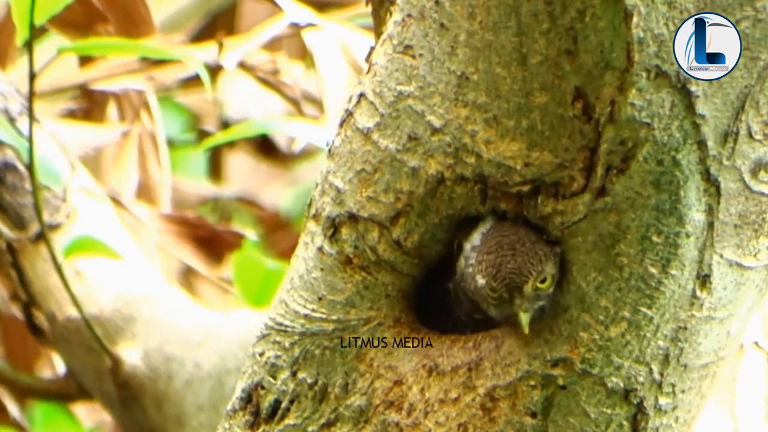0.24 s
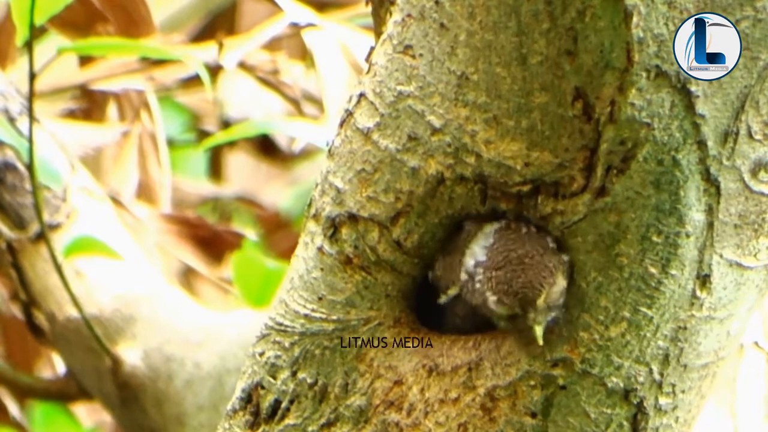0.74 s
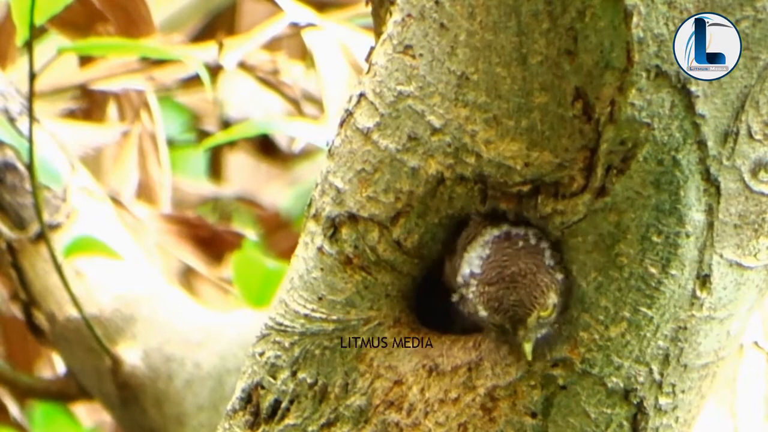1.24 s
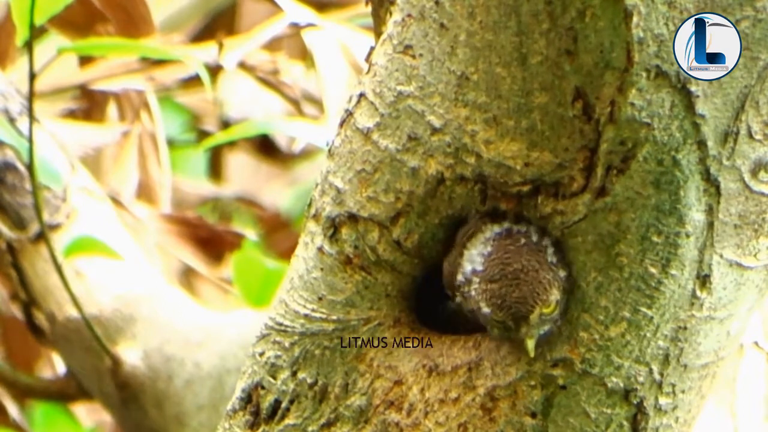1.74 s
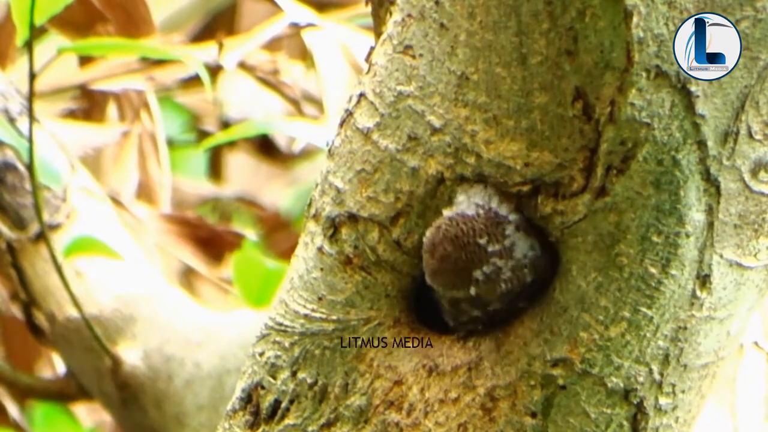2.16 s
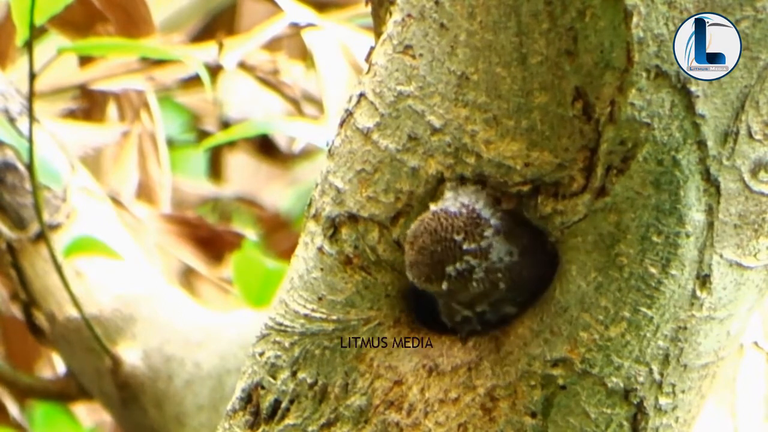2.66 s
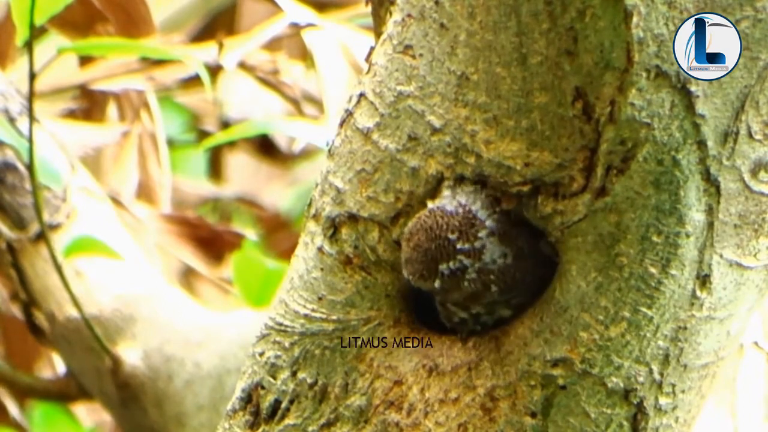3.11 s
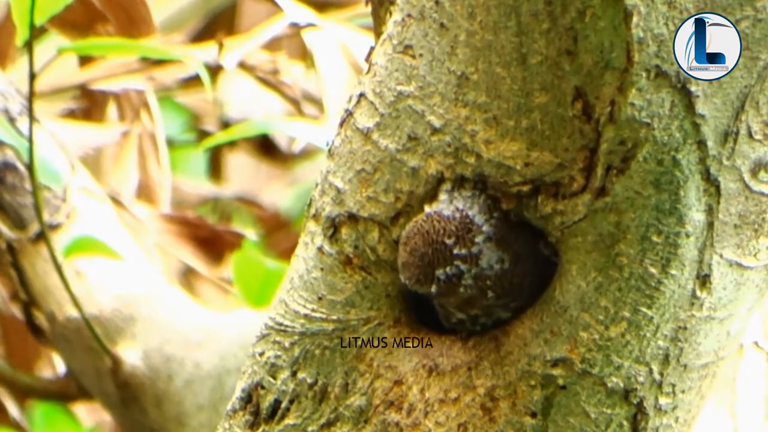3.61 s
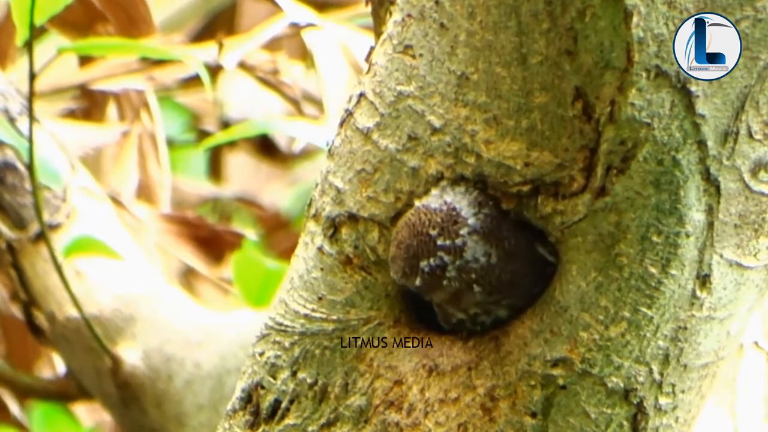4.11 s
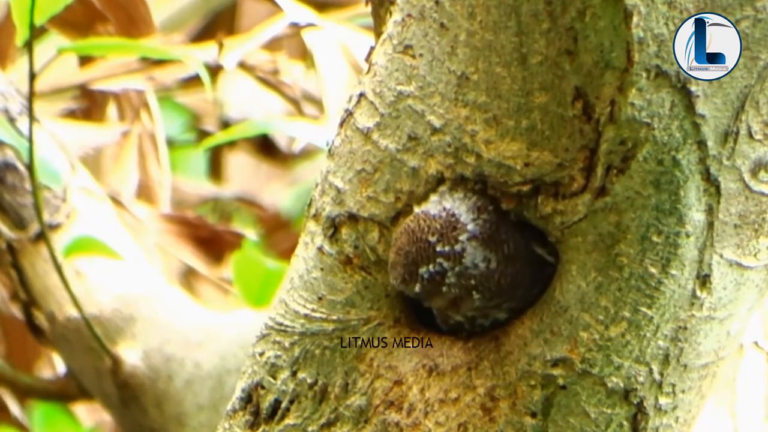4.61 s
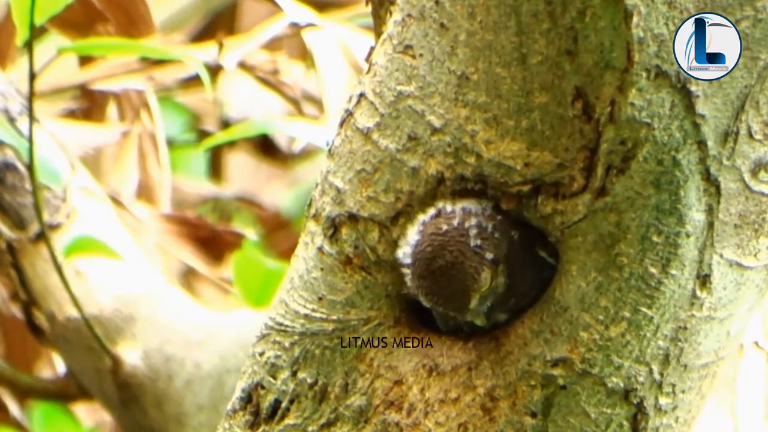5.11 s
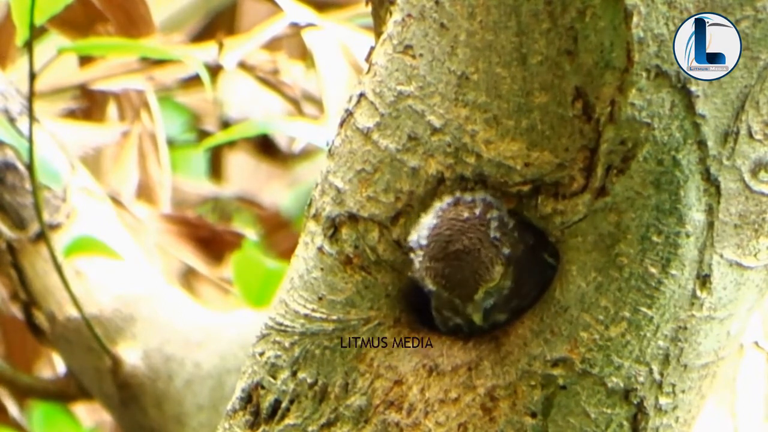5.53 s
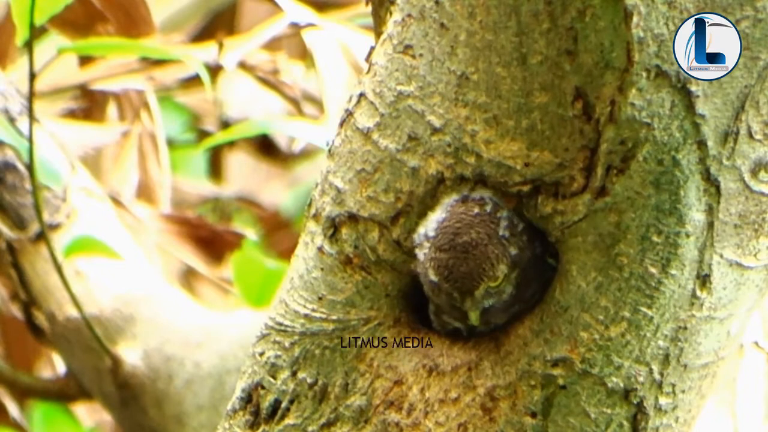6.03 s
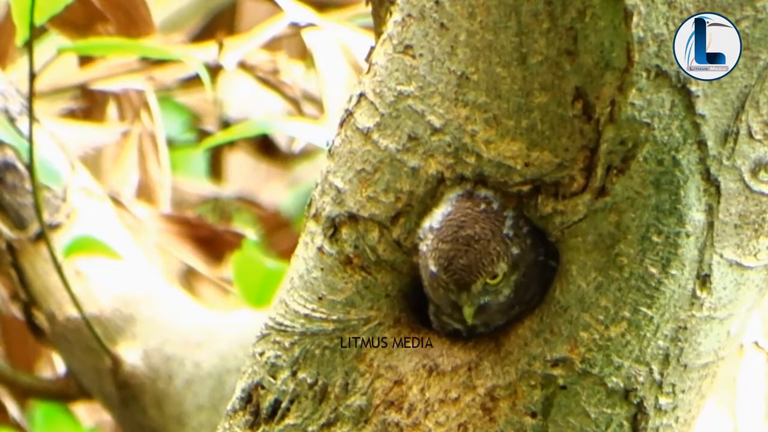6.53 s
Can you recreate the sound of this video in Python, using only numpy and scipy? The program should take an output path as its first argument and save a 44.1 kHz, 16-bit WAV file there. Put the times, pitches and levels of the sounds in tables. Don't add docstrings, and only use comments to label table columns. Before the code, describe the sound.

A wood full of insects, heard outdoors in stereo. At 0 s a shrill, rough cicada chorus is loud, with a nearer singer bursting unevenly for the first second; it sinks steadily until about 4 s, then returns slightly near the end. A small owl, a little left, calls at about 0.2, 1.0, 1.9, 2.7, 3.5, 4.3, 5.2 and 6.0 s: a short, flute-like arched hoot, then a quick trill of falling notes, echoed softly by trunks. A far owl sounds faintly at 1.3, 2.6 and 5.8 s. A bird whistles one rising note at 3 s. From 3.2 s another cicada gives bright, thin strokes every 0.4 s. A near cricket chirps in threes about once a second, a low cricket throbs, and katydids flutter in a very high hiss. Faint hum, soft air puffs, strongest near 3.9 s, and a tiny twig tick at 5.4 s.

```python
import sys
import numpy as np
from scipy import signal
from scipy.io import wavfile
from scipy.ndimage import uniform_filter1d

SR = 44100
rng = np.random.default_rng(int(sys.argv[2]) if len(sys.argv) > 2 else 0)


def int16_out(signal):
    q = np.round(np.clip(np.atleast_2d(signal).T, -1, 1) * 32767)
    wavfile.write(sys.argv[1], SR, q.astype(np.int16))


def volts(x):
    e = np.asarray(x, float) / 20
    return 10 ** e


N = 298116
T = np.arange(N) / SR


def evened(x):
    return x / np.sqrt(np.mean(x ** 2) + 1e-20)


def read(points, hz):
    f, value = np.transpose(points)
    return np.interp(np.log(hz + 1), np.log(f + 1), value)


def columns(rows):
    s, *rest = np.transpose(rows)
    return [np.interp(T, s, column) for column in rest]


def add(mix, s, sound):
    part = mix[round(s * SR):][:len(sound)]
    part += sound[:len(part)]


def resonate(x, hz, width, order=2):
    turn = np.exp(2j * np.pi * np.cumsum(hz * np.ones(len(x))) / SR)
    r = np.exp(-np.pi * width / SR)
    smooth = signal.lfilter([(1 - r) ** order], np.poly([r] * order), x * turn.conj())
    return 2 * (turn * smooth).real


def drift(hz):
    knots = rng.standard_normal(400)
    return np.interp(T * hz, np.arange(400), knots)


def swells(rows, rise, fall):
    return sum(volts(db) * np.exp(-((T - s) / np.where(T < s, rise, fall)) ** 2) for s, db in rows)


def buzz(per_s, sharp, hz, width, jitter=0.0204):
    turns = np.cumsum(per_s * (1 + jitter * drift(22))) / SR
    gate = np.exp(sharp * (np.cos(2 * np.pi * turns) - 1))
    return evened(resonate(gate * rng.standard_normal(N), hz, width, order=3))


def hiss(spectrum, patchy_db, ripple_db):
    # pitch_hz, likeness (-1 to 1)
    same_points = [(60, 1), (100, .98), (180, .1), (310, -.35), (950, -.2), (1650, .1), (2860, .3),
                   (4970, .9), (8640, .93), (15000, .88)]
    # pitch_hz, left_minus_right_db
    lean_points = [(60, 0), (180, 0.5), (550, 1.8), (1650, 0.61), (4970, -1.2), (15000, -2)]
    frames, hz = N // 256 + 5, np.fft.rfftfreq(1024, 1 / SR)
    a, b, c, d, patches = rng.standard_normal((frames, 513, 5)).T
    patches = uniform_filter1d(patches, size=10, axis=0)
    patches = evened(uniform_filter1d(patches, size=10, axis=1))
    same = np.clip(read(same_points, hz), -1, 1)[:, None]
    left = a + 1j * b
    right = same * left + np.sqrt(1 - same ** 2) * (c + 1j * d)
    z = np.array([left, right])
    lean_db = read(lean_points, hz)[:, None] / 2 * np.array([1, -1])[:, None, None]
    ripple = evened(uniform_filter1d(rng.standard_normal((513, 1)), size=1, axis=0))
    colour_db = read(spectrum, hz)[:, None]
    z *= volts(colour_db + patchy_db * patches + lean_db + ripple_db * ripple)
    return evened(signal.istft(z, nperseg=1024, noverlap=768)[1][:, :N])


def wood(x, t60, gap_s):
    taps = np.zeros((2, SR // 2))
    slots = np.arange(0, SR // 2 - 20, 20)
    at = slots + rng.integers(0, 20, (2, len(slots)))
    np.put_along_axis(taps, at, rng.choice([-1., 1.], at.shape), 1)
    t = np.arange(SR // 2) / SR
    taps *= volts(-60 * t / t60) * np.clip(t / gap_s, 0, 1)
    return signal.fftconvolve(x[None], taps / np.linalg.norm(taps[0]), axes=1)[:, :N]


def note(length, first_hz, top_hz, last_hz, top_at, loud_at, half_db):
    overtone_db = -21.5
    u = np.linspace(0, 1, round(length * SR))
    rising = (first_hz - top_hz) * (1 - u / top_at) ** 2
    falling = (last_hz - top_hz) * (abs(u - top_at) / (1 - top_at)) ** 1.117
    turn = 2 * np.pi * np.cumsum(top_hz + np.where(u < top_at, rising, falling)) / SR
    swell = np.sin(np.pi / 2 * np.interp(u, [0, loud_at, 1], [0, 1, 0])) ** 1.01
    half_line = volts(half_db) * np.exp(-((u - .25) / 0.2) ** 2) * np.sin(3 * turn / 2)
    return swell * (np.sin(turn) + volts(overtone_db) * np.sin(2 * turn)) + half_line


def air():
    # pitch_hz, level_db
    hum = [(15, -52), (25, -40), (129, -18), (794, -17.5), (1110, -10), (1780, -18), (2130, -14),
           (2430, -20), (3550, -23.5), (4650, -10.5), (6530, -20.5), (7630, -22), (8460, 1), (9640, -19),
           (12500, -25.5), (16200, -38), (22000, -120)]
    # middle_s, length_s, strength_db
    puffs = [
        (0.298, .15, 6.7),
        (.98, .15, 5.4),
        (1.5, .15, 5.7),
        (2.05, 0.14, 3.3),
        (2.851, 0.063, 2.9),
        (3.931, 0.18, 10.5),
        (4.48, 0.07, 7),
        (5.4, 0.38, 4.5),
    ]
    # start_s, level_db
    twig = [
        (5.3868, -44),
    ]
    calm_db = -2 * np.maximum(T - 1.57, 0)
    puff_db = sum(db * np.exp(-((T - s) / length) ** 2) for s, length, db in puffs)
    rumble = volts(-82 + calm_db + 0.1 * puff_db) * buzz(5, .01, 39.0, 28)
    thud = volts(-87.5 + 0.45 * calm_db + 0.89 * puff_db) * buzz(5, .01, 108.0, 90)
    gust = np.array([buzz(6.4, 0.0066, 409, 740) for ear in range(2)])
    gust = volts(-76.5 + 0.22 * calm_db + 0.97 * puff_db) * gust
    tick = np.zeros(N)
    snap = np.diff(rng.standard_normal(60), 2) * np.exp(-np.arange(58) / 15)
    add(tick, twig[0][0], volts(twig[0][1] - 9) * snap)
    return volts(-57) * hiss(hum, 2.17, 1.0) + rumble + thud + gust + tick


def fading_chorus():
    # time_s, level_db, body_pitch_hz
    chorus = [(0, -38, 8550), (.5, -42, 8430), (1.1, -42.5, 8394), (1.6, -46.5, 8245), (2.1, -49.5, 8316),
              (2.7, -50, 8230), (3.4, -55, 8214), (4.2, -60.5, 8100), (5.1, -57.5, 8420), (5.9, -58, 8320),
              (6.76, -53, 8420)]
    level_db, hz = columns(chorus)
    change_db = level_db - level_db.mean()
    low_db = -71 + 0.8 * change_db
    high_db = -63.5 + 0.46 * change_db - 18 * np.clip((T - 4) / 0.57 + .5, 0, 1)
    throb_db = 1.2 * drift(36) + .5 * drift(9)
    out = volts(level_db - 3.0 + throb_db) * buzz(230, 0.36, hz, 810)
    out += volts(low_db - 5.0 + 2.8 * drift(30)) * buzz(63, 0.057, 2152, 237)
    return out + volts(high_db - 9.0) * buzz(205, 0.32, 4096, 370)


def single_cicadas():
    # time_s, level_db
    leader = [(.012, -36), (.085, -38), (.19, -49), (.245, -37), (.3, -40), (.39, -40), (.44, -49),
              (.535, -40), (.635, -55), (.72, -46), (.89, -47)]
    # pitch_hz, throbs_per_s, start_level_db, loss_db_per_s, stop_s
    singers = [
        (8230, 16, -51, 3, 2.6),
        (8640, 17, -56, 8, 1.5),
        (8810, 11.5, -58, 1.5, 3.1),
        (9065, 14.5, -58, 2, 2.8),
        (7870, 8.3, -59, 3.5, 4.9),
    ]
    singer_widths = [51, 39, 36.5, 23.4, 256]
    burst_s = 0.017
    bursts = swells(leader, burst_s, burst_s) + volts(-47 - 8.8 * T)
    tone = np.sin(2 * np.pi * np.cumsum(8430 + 14 * drift(25.16)) / SR)
    out = bursts * evened(tone + 0.36 * buzz(24, 0.21, 8430, 60))
    for (line_hz, per_s, start_db, loss_db, stop), width in zip(singers, singer_widths):
        level = np.clip((stop - T) / .3, 0, 1) * volts(start_db - loss_db * T)
        out += level * buzz(per_s, .7, line_hz, width, jitter=.05)
    return out


def starting_cicada():
    # start_s, level_db, length_s
    strokes = [
        (3.164, -47, 0.083),
        (3.614, -42.5, 0.053),
        (4.0457, -39.5, 0.048),
        (4.451, -43.5, 0.058),
        (4.88, -43, 0.033),
        (5.2696, -43.5, 0.052),
        (5.703, -44, 0.077),
        (6.097, -40, 0.041),
        (6.534, -45, 0.049),
    ]
    out = np.zeros(N)
    t = np.arange(round(.35 * SR)) / SR
    for s, db, length in strokes:
        since = s - strokes[0][0]
        body_hz = 8425 + 84 * since
        swell = np.clip(t / 0.0042, 0, 1)
        swell *= np.where(t < length, 1, 0.53 * np.exp(-(t - length) / 0.073))
        upper = (.1 + .17 * since) * np.exp(2j * np.pi * 275 * t)
        ribs = 1 + upper + 0.22 * np.exp(-2j * np.pi * 140 * t)
        wobble = np.cumsum(uniform_filter1d(rng.standard_normal(len(t)), size=200)) * 0.0013
        tone = (ribs * np.exp(1j * (2 * np.pi * body_hz * t + wobble))).real
        add(out, s, volts(db - 5) * uniform_filter1d(swell, size=500) * tone)
    return out


def katydids():
    # pitch_hz, level_db
    katydid_colour = [(8000, -33), (11000, -21), (12600, -13), (13500, -10.5), (14400, -4), (15100, -3),
                      (15500, 1), (15900, -2)]
    turns = np.cumsum(26.0 + 0.29 * drift(2.4)) / SR
    flutter = 1
    for k, depth in enumerate((0.093, 0.03, 0.11, 0.2), 1):
        flutter = flutter + depth * np.cos(2 * np.pi * k * turns)
    return volts(-51) * flutter * hiss(katydid_colour, 1.1, 3.2)


def other_crickets():
    # first_s, last_s, throbs (a count)
    bouts = [
        (.01, 1.58, 8),
        (1.8, 2.74, 5),
        (2.95, 2.95, 1),
        (3.13, 4.69, 8),
        (4.9, 5.74, 5),
        (5.89, 5.89, 1),
        (6.07, 6.72, 4),
    ]
    bout_db = [-62, -58, -63, -64, -65.5, -68, -66]
    throbs = []
    for (first, last, count), db in zip(bouts, bout_db):
        throbs += [(s, db) for s in np.linspace(first, last, count)]
    throb = volts(-78) + swells(throbs, 0.039, .07)
    low = throb * buzz(71, 0.17, 4670, 490) * volts(1.5 * drift(12.3))
    chirps = np.exp(0.36 * (np.cos(2 * np.pi * np.cumsum(8.8 + .5 * drift(2.8)) / SR) - 1))
    far = volts(-64 - 6.9 * T) * buzz(52, 0.12, 5730, 650)
    return low + far + volts(-68.0) * chirps * buzz(61.5, 0.29, 7000, 270)


def near_cricket():
    # start_s, level_db
    triplets = [
        (0.61, -53),
        (1.695, -52),
        (2.68, -53),
        (3.686, -53),
        (4.665, -55),
        (5.654, -53.5),
        (6.684, -55.5),
    ]
    beats = [0, .151, .312]
    t, clicks = np.arange(round(.11 * SR)) / SR, np.zeros(N)
    chirps = [(s + beat, db) for s, db in triplets for beat in beats if s + beat < T[-1]]
    for s, db in chirps:
        pace = 84 + rng.uniform(-7, 7)
        scrape = rng.standard_normal(len(t))
        teeth = np.exp(1.6 * (np.cos(2 * np.pi * pace * (t - .002)) - 1))
        sweep = np.sin(2 * np.pi * np.cumsum(5730 + 150 * np.sin(2 * np.pi * pace * t)) / SR)
        swell = np.sin(np.pi * ((t + 0.0094) / 0.15) ** 0.57)
        add(clicks, s, volts(db + 3.0) * swell * teeth * (sweep + 5.1 * scrape))
    near = resonate(clicks, 5700, 560) + .6 * resonate(clicks, 5330, 200)
    return near + volts(-3.5) * wood(near, .4, .02).mean(0)


def owl():
    # start_s, stretch (times as slow), hoot_length_s
    hoots = [
        (0.2004, 1.015, .081),
        (1.029, 1, .085),
        (1.8584, 0.98, .081),
        (2.675, 0.94, .077),
        (3.51, .995, .079),
        (4.341, .98, .075),
        (5.174, .96, .073),
        (6.015, 1.001, .077),
    ]
    # hoot_db, trill_db
    efforts = [(-40.5, -39), (-41, -39), (-42, -39.5), (-40.5, -39.5), (-41.5, -40), (-41.5, -41),
               (-41.5, -40.5), (-39.5, -43)]
    # first_hz, top_hz, last_hz
    hoot_hz = (930, 1103, 1042)
    # start_s (after the call), length_s, top_hz, last_hz, level_db
    trill = [
        (.118, .033, 1135, 1015, -1.5),
        (.148, .04, 1170, 975, 1.5),
        (.191, .032, 1125, 1030, -6.5),
        (.219, .02, 1075, 960, -4),
        (.258, .036, 995, 900, -15),
    ]
    # delay_s, left_db, right_db
    trunks = [(0.02, -22.5, -10.5), (.03, -15, -15), (0.043, -29, -25), (.056, -11, -9), (.07, -16.5, -20),
              (0.09, -13.5, -21), (.12, -30, -22)]
    voice = np.zeros(N)
    for (s, stretch, hoot_length), (hoot_db, trill_db) in zip(hoots, efforts):
        lift = stretch ** 0.31
        hoot = note(hoot_length, *lift * np.array(hoot_hz), top_at=.45, loud_at=.82, half_db=-99)
        add(voice, s - .016, volts(hoot_db) * hoot)
        for start, length, top_hz, last_hz, db in trill:
            tired_db = 1.4 * s * (start / trill[-1][0]) ** 6.
            top = lift * top_hz
            sound = note(length * stretch, top - 22.8, top, lift * last_hz, 0.24, 0.49, half_db=-23.5)
            add(voice, s + start * stretch, volts(trill_db + db - tired_db) * sound)
    effort = uniform_filter1d(abs(voice), size=200)
    breath = evened(resonate(rng.standard_normal(N), 1530, 620))
    voice = voice + volts(-24.5) * effort * breath
    out = voice * volts([[1.5], [-3.5]])
    for delay, left_db, right_db in trunks:
        out += np.roll(voice, round(delay * SR)) * volts([[left_db], [right_db]])
    return out + volts(-12) * wood(voice, .8, .08)


def far_birds():
    # start_s, length_s, first_hz, last_hz, level_db
    far_owl = [
        (1.265, 0.023, 1010, 912, -49.5),
        (1.278, 0.033, 970, 911, -64),
        (2.634, 0.039, 1110, 1020, -62),
        (5.808, 0.039, 1140, 980, -65),
        (5.838, 0.059, 1120, 960, -59),
        (5.886, 0.052, 1135, 930, -57),
        (5.923, 0.0556, 1113, 936, -56),
    ]
    # time_s, pitch_hz (strong second partial), level_db
    whistle = [
        (2.94, 2230, -74),
        (2.968, 2454, -65),
        (3.012, 2580, -61),
        (3.054, 3032, -58.5),
        (3.082, 3060, -58),
        (3.1, 3050, -96),
    ]
    far = np.zeros(N)
    for s, length, first_hz, last_hz, db in far_owl:
        add(far, s, volts(db) * note(length, first_hz, first_hz, last_hz, 0.36, 0.48, -99))
    hz, level_db = columns(whistle)
    turn = 2 * np.pi * np.cumsum(hz) / SR
    sounding = uniform_filter1d(1. * (T > whistle[0][0]) * (T < whistle[-1][0]), size=400)
    companions = volts(-14) * np.sin(turn / 2) + volts(-16) * np.sin(3 * turn / 2)
    far += sounding * volts(level_db + 6 + 2.2 * drift(70)) * (np.sin(turn) + companions)
    return far * volts([[.3], [-.3]]) + volts(-5) * wood(far, .45, .02)


def scene():
    insects = fading_chorus() + single_cicadas() + starting_cicada()
    insects = insects + other_crickets() + near_cricket()
    insects = insects * volts([[-.6], [.2]]) + volts(-11) * wood(insects, 0.1, 0.015)
    return air() + insects + katydids() + owl() + far_birds()


def band_limit(x):
    return signal.sosfilt(signal.butter(12, 15760, fs=SR, output="sos"), x)


def record(dry):
    low_cut = signal.butter(4, 35, "high", fs=SR, output="sos")
    side_cut = signal.butter(4, 145, "high", fs=SR, output="sos")
    mid = signal.sosfilt(low_cut, dry.mean(0))
    side = signal.sosfilt(side_cut, (dry[0] - dry[1]) / 2)
    edge = signal.firwin(1023, 15760, window=("kaiser", 9), fs=SR)
    stereo = np.array([mid + side, mid - side])
    return band_limit(signal.oaconvolve(stereo, edge[None], "same"))


dry = scene()
out = record(dry)
int16_out(out)
```